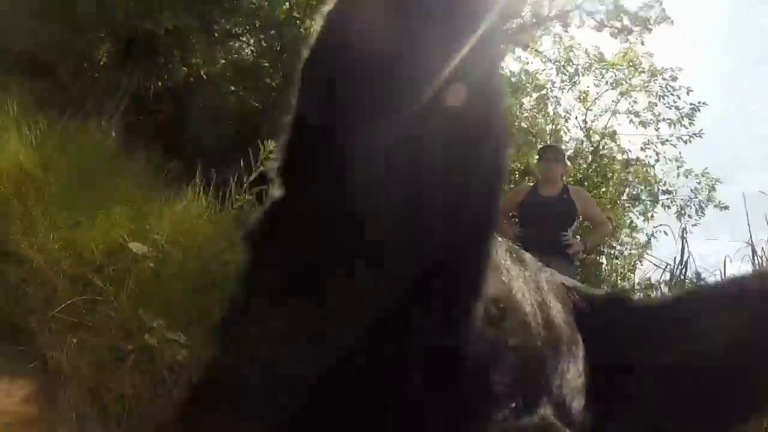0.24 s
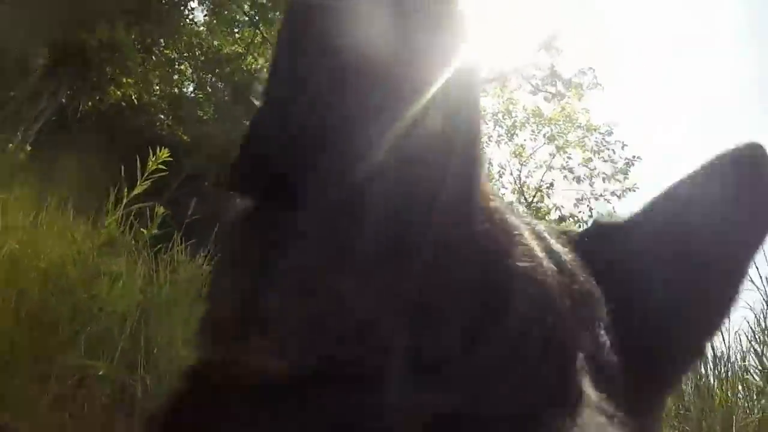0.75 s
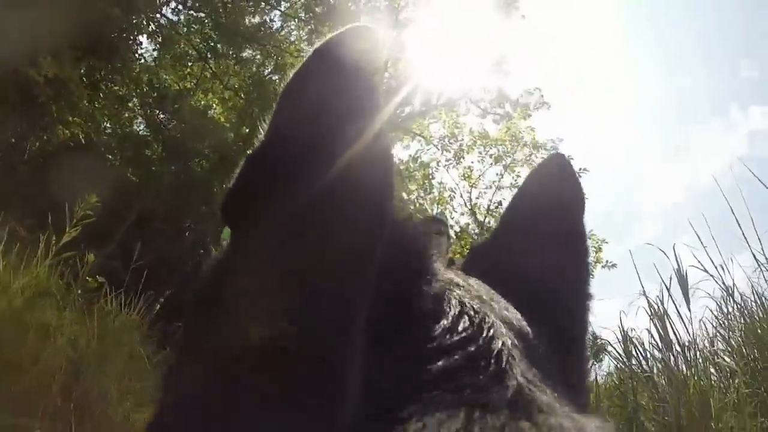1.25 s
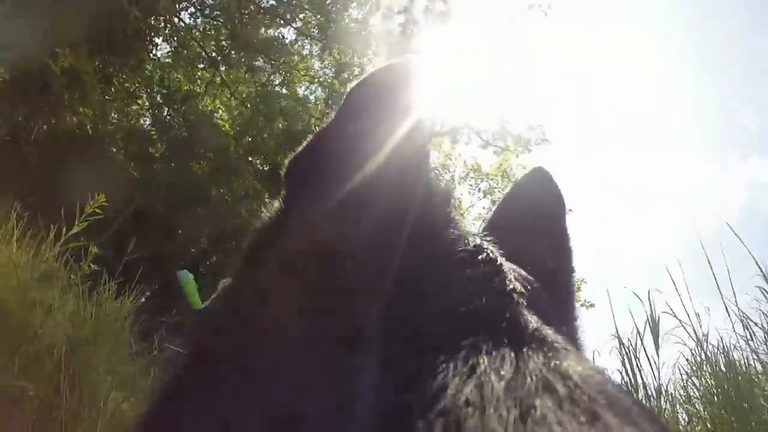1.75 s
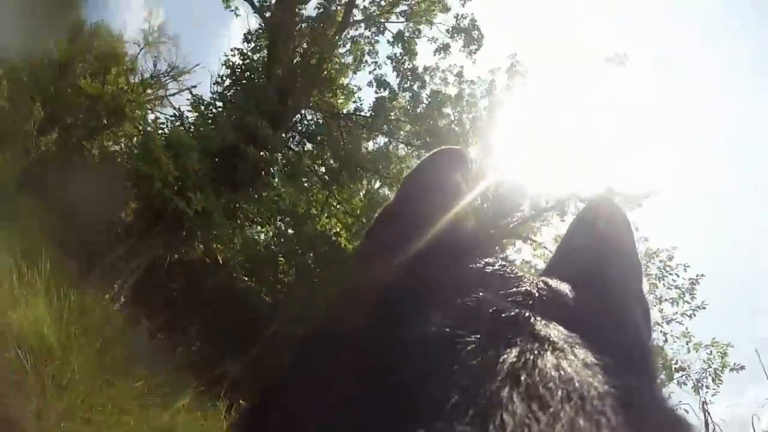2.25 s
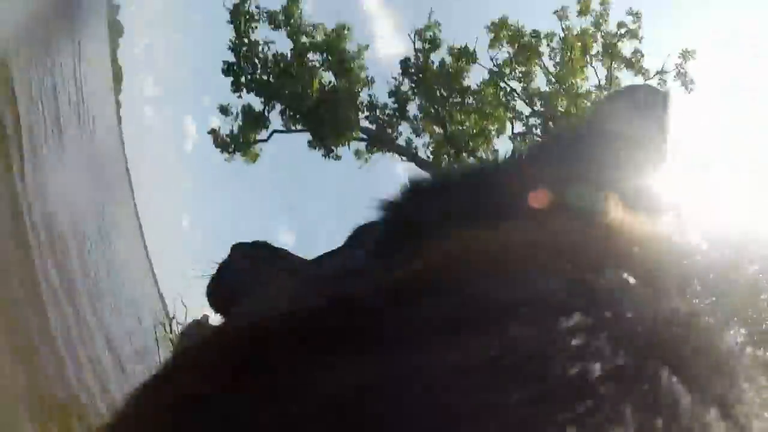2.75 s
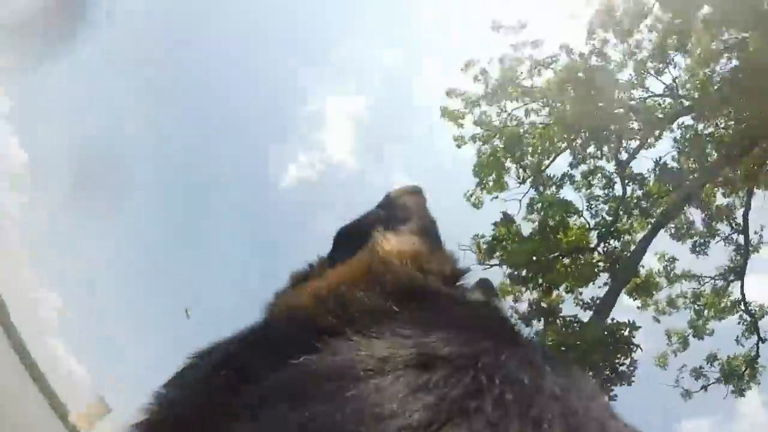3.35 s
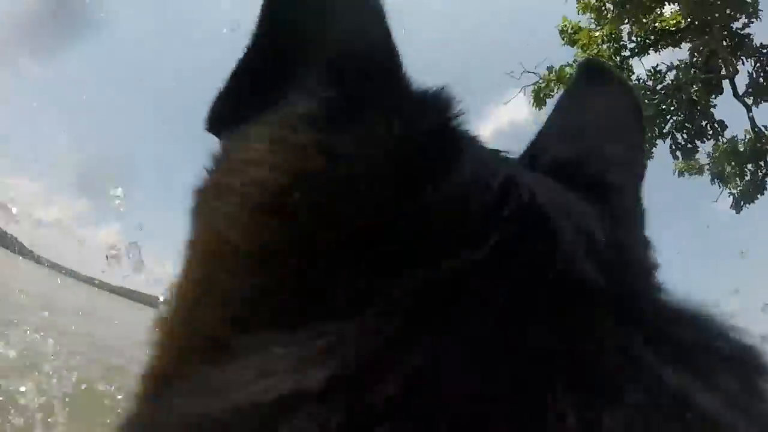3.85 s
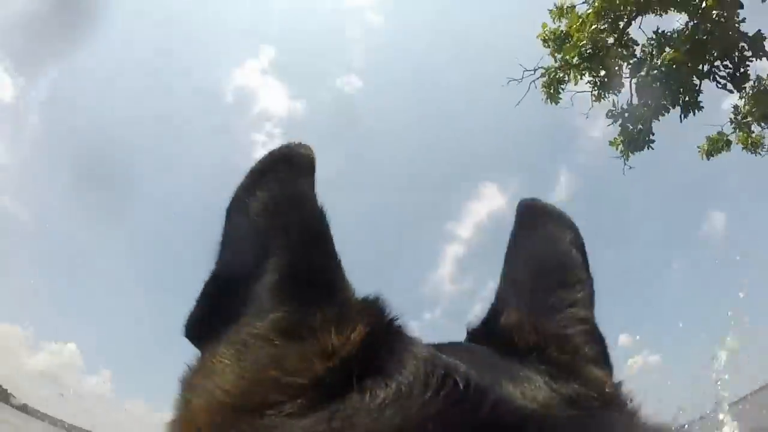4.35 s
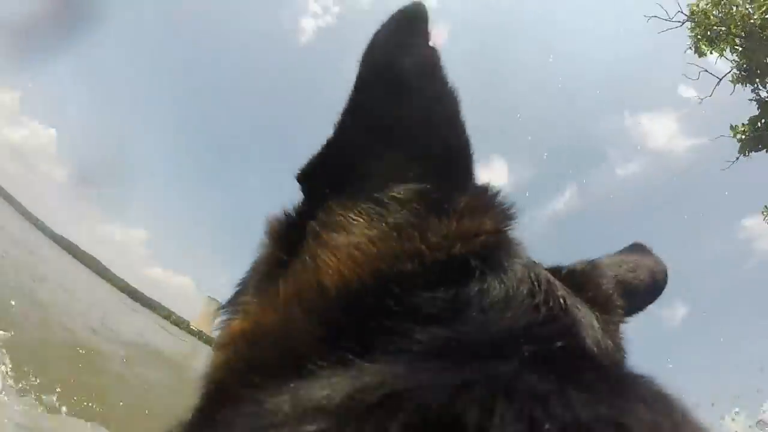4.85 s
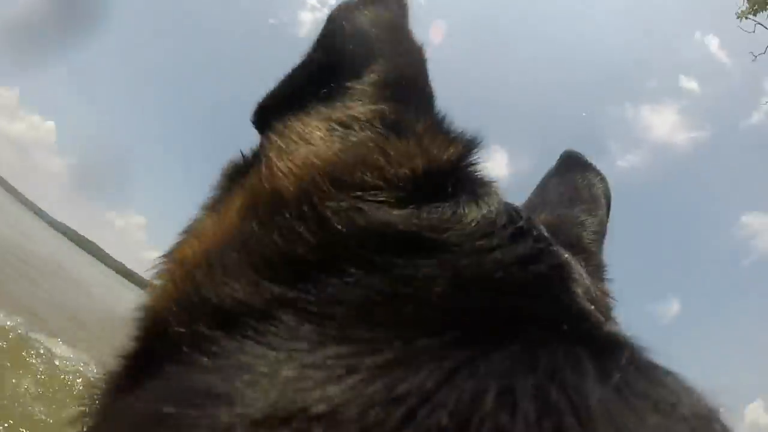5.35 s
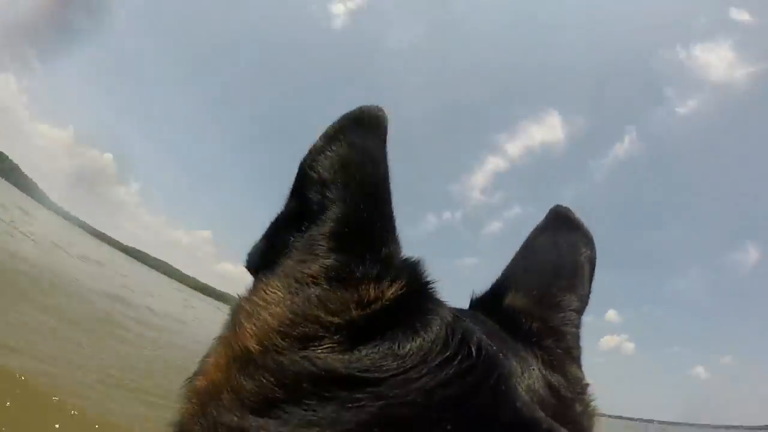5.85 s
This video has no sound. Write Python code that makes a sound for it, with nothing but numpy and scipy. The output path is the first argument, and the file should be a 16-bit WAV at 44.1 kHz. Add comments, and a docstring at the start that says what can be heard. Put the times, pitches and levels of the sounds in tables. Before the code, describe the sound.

Heard from a housing strapped to a dog's back, outdoors at a river. Fur brushes softly and the housing heaves with a low rumble and a small click at the start. At about 0.3, 0.8 and 1.3 seconds the dog barks: short, gruff and raspy, leaping up in pitch then falling, with faint scatter off the brush. A hard click and bump land at 1.4. Until 2.3 it is quieter, with light fur swishes and a soft bump. Near 2.65 bright swishes, knocks and low lurches mark the bound toward water, with spray at 3.1 and a very loud clack and thump at 3.2. From 3.7 the churning thickens: splashes at 3.9, slaps and a heavy thud at 4.3, more sloshes and clicks to 4.8. Steady wet wash, pattering drops and gurgling bubbles continue, with bumps near 5.4 and 5.7, to the end at about 6 seconds.

```python
"""A dog barks three times on a river bank, then runs into the water and ploughs through it.
Each bark mixes a ragged growl, shaped by throat and muzzle, with a clear cry an octave up.
A camera housing strapped to its back sways, bumps and clicks, and fur brushes over it: filtered grains and short rings.
In the river the legs churn up spray, slaps, clots and drops, made of grains, noise bursts and ringing bubbles."""
import sys
import numpy as np
from scipy import signal
from scipy.fft import rfft, irfft, next_fast_len
from scipy.io import wavfile
from scipy.ndimage import uniform_filter1d, minimum_filter1d, map_coordinates

SR = 44100
rng = np.random.default_rng(int(sys.argv[2]) if len(sys.argv) > 2 else 0)


def dump(signal):
    """Clip the signal to [-1, 1] and save it as 16-bit WAV at the path in sys.argv[1]."""
    limited = np.clip(np.atleast_2d(signal).T, -1, 1)
    pcm = np.round(limited * 32767).astype(np.int16)
    wavfile.write(sys.argv[1], SR, pcm)


N = 269010
TIME = np.arange(N) / SR
CUTOFF_HZ = 15600

# Fur brushing the housing on the bank. Each row: time in seconds, relative level in dB.
FUR_BRUSHING = [(0.0, -53.5), (0.61, -59), (0.79, -50.5), (0.91, -55), (1.61, -68), (2.17, -61.5),
                (2.36, -56.5)]
# Spectrum of the hairs. Each row: frequency in Hz, relative density in dB per Hz.
FUR_SPECTRUM = [(240, -11.5), (400, 0), (705, -3.5), (1420, -1), (2190, -2), (3010, -3.5), (3410, -9),
                (5070, -11), (10900, -24), (15500, -35)]
# Single swishes of fur. Each row: peak time in seconds, length in seconds, relative level in dB.
FUR_SWISHES = [(.08, 0.1, -47), (.62, 0.083, -50.5), (.745, 0.018, -45), (1.835, 0.09, -57.5),
               (1.91, 0.078, -55), (2.055, 0.073, -53), (2.43, 0.14, -47.5)]
# Lurches of the dog as it barks, steps and bounds. Each row: peak time in seconds, length in seconds,
# heave of the housing in relative dB, its drag over the coat in relative dB.
BODY_LURCHES = [(0.043, 0.12, -6, -34.5), (0.359, 0.54, -15, -33), (0.812, 0.24, -10, -56),
                (1.371, 0.2, -10, -22.5), (1.847, 0.22, -21.5, -50.5), (2.47, 0.56, -13.5, -42),
                (2.688, 0.3, -9.5, -25), (2.847, 0.39, -12.5, -31), (3.017, 0.07, -10, -31),
                (3.173, 0.45, -15, -33), (3.742, 0.12, -13.5, -21.5), (3.905, 0.41, -14, -27.5),
                (4.192, 0.034, -8.5, -28.5), (4.327, 0.13, -8.5, -17), (4.616, 0.54, -17.5, -32.5),
                (4.757, 0.39, -39, -28), (5.371, 0.29, -13, -33.5), (5.749, 0.15, -7, -41),
                (6.033, 0.2, -14, -35)]
# Spectrum of the swaying housing. Each row: frequency in Hz, relative density in dB per Hz.
SWAY_SPECTRUM = [(12, -3.5), (22, -13), (35, -14.5), (55, -26), (90, -39), (160, -50), (400, -101)]
# Spectrum of the housing rubbing on the coat. Each row: frequency in Hz, relative density in dB per Hz.
RUB_SPECTRUM = [(45, 3), (75, 11), (130, -1), (220, 0.5), (310, -8.5), (480, -20.5), (900, -26.5)]
# Between lurches the housing keeps trembling and dragging (dB relative to the fur, dB relative to the churning).
SWAY_BANK_DB, SWAY_WATER_DB = 27, 7
RUB_BANK_DB, RUB_WATER_DB = 3, -8.5
# Hard clicks on housing and mount. Each row: start in seconds, peak level in dB, main ring in Hz,
# bright snap in dB, chatter share, chatter's 60 dB decay in seconds.
HARD_CLICKS = [(0.02, -25, 1700, -20.5, 0.22, 0.056), (1.3977, -6, 2390, -24, 0.05, 0.06),
               (1.403, -18.5, 2600, -5, 0.44, 0.035), (2.6402, -28, 2770, -10, 0.34, 0.035),
               (2.7839, -21.5, 1930, -15.5, 0.13, 0.017), (3.1948, 4, 1690, -28.5, 0.015, 0.029),
               (4.186, -28.5, 2400, 0, 0.24, 0.022), (4.289, -22, 2220, -9, 0.14, 0.017),
               (4.333, -14, 1930, -2, 0.22, 0.012), (4.762, -16.5, 2120, -10, 0.59, 0.023),
               (4.7895, -25, 2100, -13, 0.35, 0.036)]
# Modes of the housing; the last is the dull knock of its mount.
# Each row: multiple of the main ring, width in Hz, relative level in dB.
HOUSING_MODES = [(0.998, 310, 4), (1.38, 564, -2.5), (1.8, 300, -9), (2.26, 404, -10.5), (2.9, 400, -21),
                 (4.4, 500, -21), (.13, 192, 3)]
# Three barks, each a grunt that leaps into a cry, breaks rough and falls as the air runs out.
# Each row of a bark: time in seconds, pitch in Hz, growl level in dB, clear cry level in dB.
BARK_CURVES = [
    [(.259, 176.4, -44, -68), (.268, 241.5, -16, -42), (.281, 296.3, -17, -32), (.303, 382, -13.5, -15),
     (.316, 320.2, -13.5, -20), (.329, 287, -19.5, -10.5), (.341, 218, -14, -27), (.354, 220.5, -20, -22),
     (.367, 186, -40.5, -30.5), (.412, 98, -57, -51)],
    [(.767, 162.6, -32, -59), (.788, 250, -24.5, -44), (.801, 337.8, -27.5, -27.5), (.819, 357, -23.5, -18),
     (.831, 286.7, -24, -21), (.852, 208, -18.5, -23.5), (.869, 203, -30, -28.5), (.882, 177.3, -46, -21.5),
     (.912, 102, -35, -35.5)],
    [(1.302, 183, -47, -66.5), (1.310, 213.2, -35.5, -61.5), (1.324, 240, -36, -50),
     (1.331, 263.5, -26, -36), (1.349, 354.2, -17, -23), (1.363, 372.2, -15, -13.5),
     (1.377, 358, -23.5, -19), (1.390, 336, -15, -7), (1.422, 280.5, -24, -28), (1.441, 241, -27.5, -28.5),
     (1.450, 163, -33.5, -60), (1.468, 119, -46, -47)],
]
# Where the voice breaks up hoarsely. Each row: peak time in seconds, length in seconds, added roughness in dB.
VOICE_BREAKS = [(.311, .07, -1), (.842, .07, -3), (1.368, .08, -6)]
CLEAR_ROUGHNESS = .27   # roughness between the breaks (0-1)
# Partials of the clear cry. Each row: multiple of the pitch, relative level in dB.
CRY_PARTIALS = [(2, 6), (4, -32), (6, -29.5)]
# Resonances of throat and open muzzle, before they follow the pitch.
# Each row: frequency in Hz, width in Hz, relative level in dB.
THROAT_MODES = [(730, 240, 2), (1182, 71, 10.5), (1639, 87, 9.5), (2067, 70, -6.5)]
# Their weak upper resonances, which carry the rasp.
# Each row: frequency in Hz, width in Hz, relative level in dB.
RASP_MODES = [(2480, 220, -15), (2850, 260, -15), (5140, 2700, -25)]
THROAT_FOLLOWS = 0.095   # the resonances rise and sink with the pitch (octaves per octave)
# A nearly shut muzzle hums low and muffles the other resonances.
HUM_HZ, HUM_WIDTH_HZ, HUM_DB = 250, 110, -6.5
SHUT_LOSS_DB = 37.5
MUZZLE_OPENS_S, MUZZLE_CLOSES_S = 0.059, 0.033
# Single drops and specks of grit. Each row: start in seconds, relative level in dB, starting pitch in Hz.
SINGLE_DROPS = [(0.4792, -35, 3130), (2.6187, -26.5, 3380), (3.09, -32.5, 4300), (5.436, -33.5, 5900),
                (5.816, -35.5, 3340), (5.969, -36.5, 5650)]
# Soft bumps of the housing on the dog's back.
# Each row: start in seconds, peak level in dB, ring in Hz, 60 dB decay in seconds.
SOFT_BUMPS = [(1.394, -15.5, 156, 0.014), (1.445, -27, 151.4, 0.013), (1.902, -35, 250, 0.069),
              (2.22, -34.5, 197, 0.035), (2.657, -22, 236, 0.079), (2.709, -18.5, 130, 0.027),
              (3.099, -19.5, 231.7, 0.063), (3.181, -1, 93, 0.0077), (3.723, -19, 219, 0.036),
              (4.183, -30, 110, 0.016), (4.294, -15, 197, 0.05), (4.333, 0.5, 44.6, 0.012),
              (4.607, -36, 130, 0.1), (5.344, -24, 105.6, 0.26), (5.402, -7.5, 173, 0.015),
              (5.729, -29, 114, 0.06), (6.031, -11.5, 170, 0.019)]
# Steady churning of the water round the dog. Each row: time in seconds, relative level in dB.
STEADY_CHURN = [(2.3, -47), (2.6, -44.5), (2.88, -46), (3.05, -38), (3.25, -45.5), (3.62, -43),
                (3.8, -34.5), (4.1, -33.5), (4.38, -36.5), (4.8, -31.5), (5.4, -35), (6.09, -39.5)]
# Bright brushing swishes of fur at first (the first two rows), then plunges of the legs that throw up spray.
# Each row: peak time in seconds, length in seconds, duller part in relative dB, bright part in relative dB.
SWISHES_AND_PLUNGES = [(2.656, 0.033, -30.5, -19), (2.75, 0.67, -31, -30.5), (3.127, 0.17, -27.5, -31.5),
                       (3.89, 0.14, -28.5, -25), (4.29, 0.081, -27, -28), (4.465, 0.12, -34.5, -32),
                       (5.282, 0.095, -34.5, -27.5)]
# Spectrum of the churned water. Each row: frequency in Hz, relative density in dB per Hz.
WATER_SPECTRUM = [(210, 8), (350, -4.5), (504, -8), (715, -13), (1710, -5.5), (2200, -8), (2980, -7),
                  (3280, -12), (3600, -11.5), (4250, -16.5), (4600, -16), (5030, -20), (5890, -14.5),
                  (8220, -28.5), (13200, -32.5), (15500, -41)]
# The chest shoves a heavy wave aside. Each row: peak time in seconds, length in seconds, level in dB.
CHEST_SLOSHES = [(3.115, 0.072, -30), (3.875, 0.041, -32), (3.945, 0.1, -28.5), (4.5, 0.17, -32.5),
                 (4.63, 0.091, -39), (4.725, 0.077, -35), (5.72, 0.035, -29.5)]
# Spectrum of the sloshing waves. Each row: frequency in Hz, relative density in dB per Hz.
SLOSH_SPECTRUM = [(140, -2.5), (240, 0.5), (400, -12), (750, -18), (1400, -17.5)]
# Legs and waves slapping the water. Each row: start in seconds, peak level in dB,
# pitch of the air pocket in Hz, 60 dB decay in seconds.
WATER_SLAPS = [(3.294, -36, 1670, 0.069), (3.728, -23.5, 970, 0.05), (3.882, -21.5, 1320, 0.078),
               (4.298, -23, 730, 0.027), (4.334, -18, 540, 0.016), (4.49, -35, 750, 0.047),
               (4.598, -49, 694, 0.035), (4.754, -22.5, 820, 0.085), (4.827, -27.5, 1410, 0.06),
               (4.966, -27.5, 1510, 0.072), (5.475, -32, 1120, 0.066), (5.714, -29.5, 1200, 0.095)]


def from_db(db):
    """Decibels to gain."""
    return 10 ** (np.asarray(db) / 20)


def rms_one(x):
    """Scale to unit power."""
    return x / np.sqrt(np.mean(x ** 2) + 1e-20)


def even(x, seconds):
    """Hold the running power near one."""
    size = max(int(seconds * SR), 3)
    power = uniform_filter1d(uniform_filter1d(x * x, size), size)
    return x / np.sqrt(np.abs(power) + 1e-12)


def in_time(rows, t=TIME):
    """Join the rows of a curve by straight lines."""
    s, *columns = np.transpose(rows)
    return [np.interp(t, s, column) for column in columns]


def cut(x, hz, kind, order=2):
    """Butterworth filter."""
    sos = signal.butter(order, np.clip(hz, 10, .45 * SR), kind, fs=SR, output="sos")
    return signal.sosfilt(sos, x + 1e-18)


def drift(rate, count=N):
    """Smooth random wander of about unit spread, with `rate` knots per second."""
    knots = rng.standard_normal(count // 8 + 4)
    places = np.arange(count) * min(rate / SR, 1 / 8)
    return map_coordinates(knots, [places], order=2, mode="nearest")


def resonate(x, hz, width):
    """One resonance with gain one at its top."""
    r = np.exp(-np.pi * width / SR)
    zeros = np.array([1, 0, -1]) * (1 - r * r) / 2
    poles = [1, -2 * r * np.cos(2 * np.pi * hz / SR), r * r]
    return signal.lfilter(zeros, poles, x + 1e-18)


def body(x, modes):
    """Parallel resonances of alternating sign."""
    return sum((-1) ** k * from_db(db) * resonate(x, hz, width) for k, (hz, width, db) in enumerate(modes))


def stretched_body(x, modes, stretch):
    """Resonances whose frequencies all move by the factor stretch: the filter runs on a warped clock."""
    clock = np.cumsum(stretch)
    steady = np.arange(clock[-1])
    return np.interp(clock, steady, body(np.interp(steady, clock, x), modes))


def colour(x, spectrum, edge_order=3):
    """Give a white sound a smooth spectrum that falls away beyond its ends; unit power."""
    hz, db = np.transpose(spectrum)
    size = next_fast_len(N)
    f = np.maximum(np.fft.rfftfreq(size, 1 / SR), 1)
    edges = np.minimum(1, np.minimum(f / hz[0], hz[-1] / f)) ** edge_order
    gain = from_db(np.interp(np.log(f), np.log(hz), db)) * edges
    return rms_one(irfft(rfft(x, size) * gain, size)[:N])


def add(out, s, sound):
    """Mix a sound in at a time."""
    at = max(round(s * SR), 0)
    out[at:at + len(sound)] += sound[:max(N - at, 0)]


def grains(per_s, spread_db):
    """Random tiny impacts, a few much larger than the rest."""
    out, born = np.zeros(N), np.flatnonzero(rng.random(N) < per_s / SR)
    sign, size = rng.random((2, N))[:, born]
    out[born] = np.sign(sign - .5) * from_db(spread_db * np.minimum(-np.log(1 - size), 5))
    return out


def swells(rows, rise_share=0.5, shape=2.2):
    """Gain of movements (peak s, length s, dB): each builds and dies away, 20 dB below its peak at its ends."""
    power, share = np.zeros(N), np.clip(rise_share, .1, .9)
    for s, length, db in rows:
        near = slice(*np.searchsorted(TIME, [s - 2 * length, s + 2 * length]))
        t = (TIME[near] - s) / length
        drop_db = 20 * np.maximum(-t / share, t / (1 - share)) ** shape
        power[near] += from_db(db - drop_db) ** 2
    return np.sqrt(power)


def brushing():
    """Gain of the fur's steady brushing, which ends where the water begins."""
    return from_db(in_time(FUR_BRUSHING)[0]) * np.interp(TIME, [2.28, 2.36], [1, 0])


def churning():
    """Gain of the water's steady churning, and of the same with the swishes and plunges."""
    steady = from_db(in_time(STEADY_CHURN)[0])
    bursts = swells([row[:3] for row in SWISHES_AND_PLUNGES], rise_share=0.4, shape=1.42)
    return steady, np.hypot(steady, bursts)


def dragging():
    """Gain of the housing's drag: it follows the lurches, the brushing fur and the push of the water."""
    lurches = swells([(s, length, drag) for s, length, _, drag in BODY_LURCHES], rise_share=0.5, shape=1.24)
    return np.hypot(lurches, from_db(RUB_BANK_DB) * brushing() + from_db(RUB_WATER_DB) * churning()[0])


def fur(flicker_db=2.0, brush_db=4.5, swish_db=3.5):
    """Hairs flick across the housing in small clumps: dense grains of wandering level, coloured."""
    hairs = colour(grains(12000, 1.7) * from_db(flicker_db * drift(79)), FUR_SPECTRUM)
    swishing = swells(FUR_SWISHES, rise_share=0.39, shape=1.1)
    return np.hypot(from_db(brush_db) * brushing(), from_db(swish_db) * swishing) * hairs


def harness(sway_db=1.5, rub_db=0.5, lump_db=0.5):
    """The housing heaves with each lurch as low noise and drags dully over the coat as coloured grains."""
    lurches = swells([(s, length, heave) for s, length, heave, _ in BODY_LURCHES], rise_share=0.36, shape=1.42)
    trembling = from_db(SWAY_BANK_DB) * brushing() + from_db(SWAY_WATER_DB) * churning()[0]
    heaving = np.hypot(lurches, trembling)
    sway = from_db(sway_db) * heaving * even(colour(rng.standard_normal(N), SWAY_SPECTRUM), .05)
    slips = even(colour(grains(400, 3.0), RUB_SPECTRUM), .04)
    # the coat catches and lets go in lumps
    rub = from_db(rub_db + lump_db * drift(28)) * dragging() * slips
    return sway + rub


def clicks():
    """A sharp contact and its quick chatter ring the plastic housing, higher or lower by where they land."""
    out, t = np.zeros(N), TIME[:SR // 12]
    for s, db, ring_hz, snap_db, chatter, t60 in HARD_CLICKS:
        contact = (t == 0) + chatter * rng.standard_normal(len(t)) * from_db(-60 * t / t60)
        modes = [(min(k * ring_hz, CUTOFF_HZ), width, level) for k, width, level in HOUSING_MODES]
        ring = cut(body(contact, modes), 8500, "low")
        snap = cut(contact, [800, 7000], "band", order=1)
        click = ring + from_db(snap_db) * snap
        add(out, s, from_db(db) * click / np.abs(click).max())
    return out


def bark(rows, slope=0.69):
    """The folds give a ragged growl; under effort they also ring clearly an octave higher."""
    start, end = rows[0][0], rows[-1][0]
    t = np.arange(start, end, 1 / SR)
    pitch, growl_level, cry_level = in_time(rows, t)
    mouth = np.minimum((t - start) / MUZZLE_OPENS_S, (end - t) / MUZZLE_CLOSES_S)
    shut = 1 - np.clip(mouth, 0, 1)
    rough = np.minimum(CLEAR_ROUGHNESS + np.interp(t, TIME, swells(VOICE_BREAKS)), 1)
    shaky_pitch = pitch * (1 + .05 * rough * drift(260, len(t)))
    phase = 2 * np.pi * np.cumsum(shaky_pitch) / SR
    folds = rms_one(sum(np.cos(k * phase) / k ** slope for k in np.arange(1, 30)))
    # when rough, strong and weak cycles alternate, and air rushes through at each opening
    folds = folds * (1 + rough * (.7 * np.cos(phase / 2) + .9 * drift(300, len(t))))
    hiss = rms_one(cut(rng.standard_normal(len(t)), 3500, "low", order=1))
    air = hiss * (1 + np.cos(phase))
    source = folds + rough * air
    stretch = 2 ** (.02 * drift(60, len(t))) * (pitch / 300) ** THROAT_FOLLOWS
    throat = cut(stretched_body(source, THROAT_MODES, stretch), 2100, "low", order=8)
    throat = cut(throat, 720, "high")
    rasp = cut(stretched_body(.5 * (source + air), RASP_MODES, stretch), 1900, "high", order=4)
    hum = cut(resonate(source, HUM_HZ, HUM_WIDTH_HZ), 340, "low", order=3)
    hum = cut(hum, 160, "high")
    growl = from_db(HUM_DB) * hum + from_db(-SHUT_LOSS_DB * shut) * (throat + rasp)
    cry = rms_one(sum(from_db(db) * np.sin(k * phase) for k, db in CRY_PARTIALS))
    cry = cry * (1 + .4 * rough * drift(170, len(t)))
    ends = np.clip(np.minimum(t - start, end - t) / .004, 0, 1)   # 4 ms fades
    # the muzzle shapes the growl's tone; its loudness follows the curve alone
    return ends * (even(growl, 0.015) * from_db(growl_level) + cry * from_db(cry_level))


def dog(echo_s=0.122, echo_db=-30, scatter_db=-29, scatter_t60=.3):
    """Three barks, their scatter from the brush (decaying noise) and their thin return from the trees."""
    direct, echo, t = np.zeros(N), np.zeros(N), TIME[:SR // 2]
    for rows in BARK_CURVES:
        add(direct, rows[0][0], bark(rows))
    add(echo, echo_s, cut(direct, [800, 1350], "band", order=3))
    brush = rng.standard_normal(len(t)) * from_db(-60 * t / scatter_t60)
    scatter = signal.fftconvolve(cut(direct, 1200, "high"), brush / np.linalg.norm(brush))[:N]
    return direct + from_db(echo_db) * echo + from_db(scatter_db) * scatter


def drops(phase_rise_per_s=8, drop_db=4.5):
    """Each speck lands with a tick of noise and a very short rising ping."""
    out, t = np.zeros(N), TIME[:SR // 20]
    fade = from_db(-60 * t / .014)
    for s, db, hz in SINGLE_DROPS:
        tick = rms_one(cut(rng.standard_normal(len(t)), [.8 * hz, 1.7 * hz], "band"))
        ping = np.sin(2 * np.pi * hz * t * (1 + phase_rise_per_s * t))   # pitch climbs at twice this rate
        add(out, s, from_db(db + drop_db) * fade * (ping + tick) / 2)
    return out


def bumps(contact_s=0.0035):
    """A padded blow swells over a few milliseconds and rings the mount briefly."""
    out, t = np.zeros(N), TIME[:SR // 8]
    padding = 1 - np.exp(-(t / contact_s) ** 2)
    for s, db, hz, t60 in SOFT_BUMPS:
        thud = np.sin(2 * np.pi * hz * t) * from_db(-60 * t / t60) * padding
        add(out, s, from_db(db) * thud / np.abs(thud).max())
    return out


def water(bubble_db=-4.0, patchy_db=9.5, surge_db=2.2, bright_hz=4200, calm_bright_db=0.0,
          bright_growth=1.16, water_db=-6.0):
    """Churned water: a sheet of bursting spray and small ringing bubbles; its noise also gives two fur swishes."""
    steady, churn = churning()
    bubbles = np.zeros(N)
    for hz in np.geomspace(450, 13000, 40):
        # small bubbles are more numerous than large ones
        ring = rms_one(resonate(grains(3.5 * np.sqrt(hz), 4.0), hz, hz / 14))
        patches = from_db(patchy_db * np.minimum(drift(20), 1))
        bubbles += np.sqrt(hz) * ring * patches
    sheet = rms_one(grains(12000, 2.0)) * from_db(surge_db * drift(90))
    wash = colour(sheet + from_db(bubble_db) * rms_one(bubbles), WATER_SPECTRUM)
    dull = signal.sosfiltfilt(signal.butter(2, bright_hz, fs=SR, output="sos"), wash)
    # harder churning throws finer spray: the treble grows faster than the wash
    calm = from_db(calm_bright_db) * steady.max() * (steady / steady.max()) ** bright_growth
    bursts = swells([(s, length, db) for s, length, _, db in SWISHES_AND_PLUNGES], rise_share=0.46, shape=1.04)
    bright = np.hypot(calm, bursts)
    entry = np.interp(TIME, [2.28, 2.36], [0, 1])
    return from_db(water_db) * entry * (churn * dull + bright * (wash - dull))


def splatter(per_s=60, splatter_db=-6.5, decay_s=0.072):
    """Thrown water falls back in clots, each a brief patter round a pitch of its own."""
    out, t, churn = np.zeros(N), TIME[:SR // 16], churning()[1]
    start, end = 2.65, TIME[-1]
    fade = from_db(-60 * t / decay_s) * (1 - np.exp(-t / .001))
    for when, height, weakness in rng.random((int(per_s * (end - start)), 3)):
        s = start + when * (end - start)
        hz = 1000 * 4 ** height
        clot = rms_one(resonate(rng.standard_normal(len(t)), hz, hz / 20))
        add(out, s, from_db(splatter_db - 10 * weakness) * churn[int(s * SR)] * fade * clot)
    return cut(out, 4300, "low")


def sloshes(slosh_db=0.0):
    """Each wave folds over with a lumpy, hollow surge of sparse coloured grains."""
    lumps = even(colour(grains(700, 3.0), SLOSH_SPECTRUM), .03)
    return from_db(slosh_db) * swells(CHEST_SLOSHES, rise_share=0.53, shape=1.5) * lumps


def slaps():
    """A slap is a short burst of noisy splatter in a broad pocket of air."""
    out, t = np.zeros(N), TIME[:SR // 8]
    for s, db, hz, t60 in WATER_SLAPS:
        burst = rng.standard_normal(len(t)) * from_db(-60 * t / t60) * (1 - np.exp(-t / 0.00061))
        slap = cut(resonate(burst, hz, hz), 2100, "low")
        add(out, s, from_db(db) * slap / np.abs(slap).max())
    return out


def gurgles(per_s=70, gurgle_db=-1.0, cycles=12, rise=0.037):
    """Where the chest pushes deep, large bubbles break off and ring with a rising pitch."""
    churn_db, rub_db = 20 * np.log10([churning()[1], dragging()])
    out, t = np.zeros(N), TIME[:SR // 16]
    start, end = 3.87, TIME[-1]
    for when, smallness, strength in rng.random((int(per_s * (end - start)), 3)):
        s = start + when * (end - start)
        hz = 350 * 6 ** smallness
        t60 = cycles / hz
        # the large ones follow the shove of the body, the small ones the churning
        at = int(s * SR)
        db = smallness * churn_db[at] + (1 - smallness) * rub_db[at]
        db += gurgle_db + 4 * (2 * strength - 1)
        ring = np.sin(2 * np.pi * hz * t * (1 + rise * np.minimum(t / t60, 1) / 2))
        add(out, s, from_db(db - 60 * t / t60) * ring)
    return out


def scene():
    """Everything reaches the one microphone on the dog's back."""
    on_the_back = fur() + harness() + clicks() + bumps()
    river = water() + splatter() + sloshes() + slaps() + gurgles()
    return (on_the_back + dog() + drops() + river)[None]


def record(dry, release_db_per_s=85):
    """A limiter ducks whatever passes full scale and recovers slowly; the top is cut."""
    over_db = 20 * np.log10(np.maximum(np.abs(dry[0]), 1))
    recovery_db = release_db_per_s * TIME
    duck_db = np.maximum.accumulate(over_db + recovery_db) - recovery_db
    # widen each dip, then smooth its edges
    gain = uniform_filter1d(minimum_filter1d(from_db(-duck_db), size=128), size=128)
    top_cut = signal.cheby2(18, 70, CUTOFF_HZ + 400, fs=SR, output="sos")
    return signal.sosfilt(top_cut, dry * gain)


dry = scene()
out = record(dry)
dump(out)
```